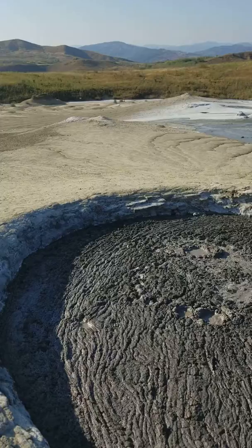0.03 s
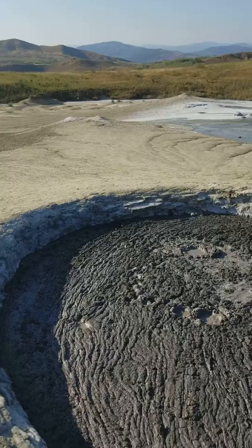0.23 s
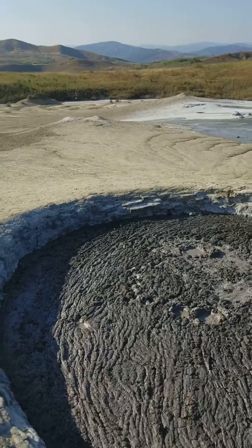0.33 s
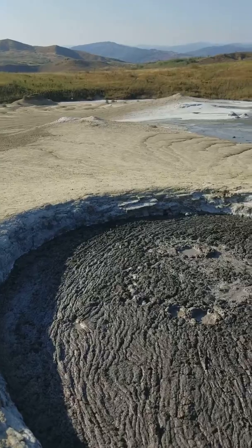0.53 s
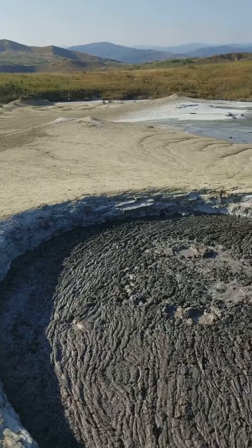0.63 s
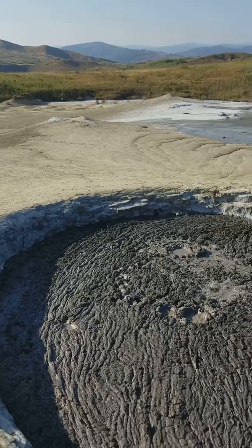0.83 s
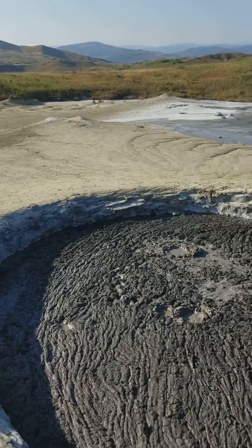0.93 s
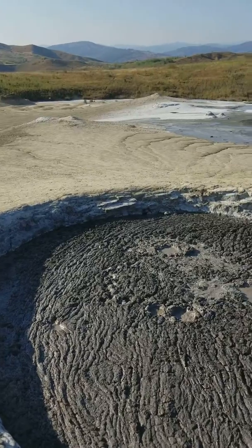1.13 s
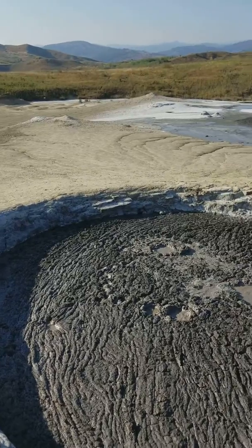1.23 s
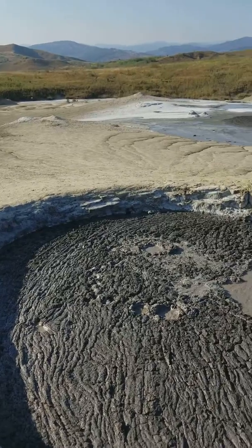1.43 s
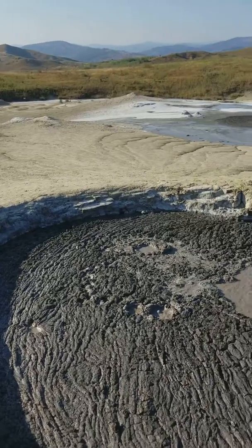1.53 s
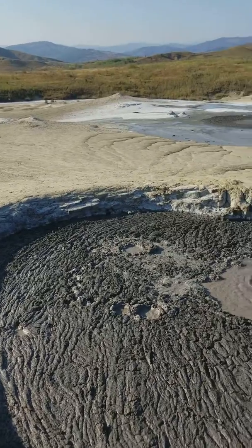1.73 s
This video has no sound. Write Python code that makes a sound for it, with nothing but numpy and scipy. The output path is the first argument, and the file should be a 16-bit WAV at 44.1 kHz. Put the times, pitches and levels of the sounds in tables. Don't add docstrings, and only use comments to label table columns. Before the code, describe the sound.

Close stereo pickup beside bubbling mud in open country; fizzing gas and tiny crackles run throughout, wind buffets the microphone in the first half, wet glugs burst around the middle, and a bigger bubble bursts late.

```python
import sys
import numpy as np
from scipy import signal
from scipy.fft import rfft, irfft
from scipy.io import wavfile
from scipy.ndimage import uniform_filter1d

SR = 44100
rng = np.random.default_rng(int(sys.argv[2]) if len(sys.argv) > 2 else 0)


def boost_factor(decibels):
    exponent = np.asarray(decibels, float) / 20
    return 10 ** exponent


def output_pcm(signal):
    pcm = np.clip(np.atleast_2d(signal).T, -1, 1) * 32767
    wavfile.write(sys.argv[1], SR, np.round(pcm).astype(np.int16))


N = 79380
TOP_HZ = 15750.0
ONSET_S = 0.002


def evened(x):
    return x / np.sqrt(np.mean(x ** 2) + 1e-20)


def read(points, hz):
    f, value = np.transpose(points)
    return np.interp(np.log(hz + 1), np.log(f + 1), value)


def along(table, column=1):
    return np.interp(np.arange(N) / SR, np.array(table)[:, 0], np.array(table)[:, column])


def colour(x, points, lo_hz, hi_hz):
    hz = np.fft.rfftfreq(x.shape[-1], 1 / SR)
    edge = np.clip((hz - lo_hz) / (0.34 * lo_hz), 0, 1) * (hz < hi_hz)
    return irfft(rfft(x) * boost_factor(read(points, hz)) * edge, x.shape[-1])


def slow(shape, seconds):
    size = max(int(seconds * SR), 2)
    noise = rng.standard_normal(shape)
    return evened(uniform_filter1d(uniform_filter1d(noise, size), size))


def add(mix, start_s, sound, lean_db):
    at = round(start_s * SR)
    part = mix[:, at:at + len(sound)]
    part += boost_factor([[lean_db / 2], [-lean_db / 2]]) * sound[:part.shape[1]]


def ring(hz, level_db, wander):
    n = len(hz)
    level = boost_factor(level_db + 3 * wander[0, :n])
    phase = 2 * np.pi * np.cumsum(hz * (1 + 0.025 * wander[1, :n])) / SR
    return np.sqrt(2) * level * np.sin(phase)


def bubble(length_s, first_hz, last_hz, level_db, tail_share=0.55, onset_s=ONSET_S):
    t = np.arange(0, length_s * (1 + tail_share), 1 / SR)
    tail = np.clip((t / length_s - 1 + tail_share) / (2 * tail_share), 0, 1)
    envelope = np.minimum(t / onset_s, 1) * np.cos(np.pi / 2 * tail) ** 2
    hz = first_hz * (last_hz / first_hz) ** (t / length_s)
    return envelope * ring(hz, level_db, slow((2, 8192), 0.0042))


def pockets(out, mud_lean):
    # time_s, pitch_hz, level_db
    large_pocket = [(1.4285, 172, -52), (1.434, 180, -47), (1.456, 222, -43), (1.48, 293, -36),
                    (1.494, 350, -33), (1.504, 400, -38), (1.513, 445, -49), (1.522, 465, -48),
                    (1.537, 485, -62)]
    # time_s, pitch_hz, level_db
    pocket_neck = [(1.4295, 312, -48), (1.447, 325, -46), (1.468, 423, -46), (1.48, 510, -45),
                   (1.487, 565, -53), (1.494, 595, -48), (1.51, 600, -62), (1.52, 610, -56),
                   (1.545, 700, -70)]
    # time_s, pitch_hz, level_db
    gulp = [(.41, 260, -56), (.43, 294, -54), (.447, 400, -58), (.46, 620, -60), (.468, 740, -67),
            (.476, 790, -60), (.508, 1050, -73)]
    # time_s, pitch_hz, level_db
    blurt = [(1.577, 800, -52), (1.584, 860, -46), (1.592, 930, -51), (1.6, 1250, -57), (1.608, 1850, -66)]
    for table in (large_pocket, pocket_neck, gulp, blurt):
        s, pitch_hz, level_db = np.transpose(table)
        t = np.arange(s[0], s[-1], 1 / SR)
        edges = np.minimum(np.minimum(t - s[0], s[-1] - t) / ONSET_S, 1)
        hz = uniform_filter1d(np.interp(t, s, pitch_hz), size=250)
        tone = ring(hz, np.interp(t, s, level_db), 0.5 * slow((2, 8192), 0.004))
        add(out, s[0], edges * tone, read(mud_lean, pitch_hz.mean()))


def rim_echo(x):
    # delay_s, level_db
    rim_echoes = [
        (.0031, -19),
        (.0085, -21),
    ]
    rim = np.zeros((2, 2048))
    rim[:, 0] = 1
    for delay_s, level_db in rim_echoes:
        at = (delay_s * SR * rng.uniform(0.85, 1.15, 2)).astype(int)
        rim[[0, 1], at] = boost_factor(level_db) * rng.choice([-1, 1], 2)
    return signal.fftconvolve(x, rim, axes=1)[:, :N]


def mud():
    # freq_hz, left_over_right_db
    mud_lean = [(200, -6), (500, 3.5), (1000, -1), (2000, -13.5)]
    # freq_hz, left_lead_rad
    mud_lead = [(200, -.2), (1100, -.45)]
    # start_s, length_s, first_hz, last_hz, level_db
    glugs = [(0.082, 0.025, 950, 800, -75), (0.341, 0.016, 800, 1200, -74), (.352, .022, 720, 1150, -74),
             (0.387, 0.03, 560, 600, -72), (.553, .02, 470, 640, -69), (0.575, 0.026, 597, 550, -70),
             (0.558, 0.071, 914, 769, -74), (.712, .05, 350, 460, -72), (0.792, 0.02, 780, 1074, -68),
             (0.815, 0.011, 1140, 1670, -74), (0.888, 0.02, 1034, 1010, -67), (0.909, 0.045, 337, 363, -62),
             (0.945, .025, 560, 800, -65), (0.913, 0.011, 1302, 1770, -59), (0.985, 0.016, 400, 520, -66),
             (1.021, 0.016, 900, 1266, -64), (1.551, 0.022, 1745, 1700, -67),
             (1.612, 0.0089, 1030, 920, -50), (1.405, .026, 240, 340, -68), (1.54, .03, 700, 850, -66),
             (1.322, .012, 850, 700, -70), (1.334, .022, 720, 800, -71), (.85, .013, 800, 1050, -72)]
    # start_s, pitch_hz, level_db, length_s
    plips = [(.108, 1430, -75.5, .01), (0.115, 1200, -74.5, .006), (0.141, 1430, -74, 0.0076),
             (0.135, 736, -79, .008), (0.171, 1540, -63.5, 0.0047), (.18, 1520, -69, 0.0074),
             (.163, 870, -71, .012), (.214, 777, -73.5, .009), (0.25, 1680, -69, 0.006),
             (.39, 880, -73, 0.0062), (.413, 806, -66, 0.0094), (0.426, 610, -63.5, 0.01),
             (0.446, 860, -69, .008), (0.781, 478, -63, .007), (0.841, 3340, -70, 0.0032),
             (0.864, 4150, -71.5, 0.0033), (0.862, 2290, -78, .004), (.909, 510, -60, 0.0054),
             (.917, 460, -53, 0.0093), (.918, 994, -59, 0.008), (0.93, 505, -54, 0.0063),
             (.938, 590, -60.5, 0.0072), (.939, 1725, -65.5, 0.0097), (0.961, 1320, -69, 0.0063),
             (0.966, 960, -60, 0.006), (0.975, 760, -61.5, .006), (.985, 805, -66, 0.01),
             (1.0, 1045, -75, .008), (1.013, 765, -62.5, .006), (1.022, 777, -58.5, 0.0062),
             (1.041, 900, -70, .006), (1.054, 880, -70, .006), (1.069, 704, -68, 0.0069),
             (1.098, 824, -66, 0.0067), (1.109, 795, -70.5, .006), (1.131, 840, -64, 0.0076),
             (1.326, 1117, -65.5, 0.01), (1.324, 1600, -75, .005), (1.373, 1620, -72.5, .006),
             (1.574, 599, -55, 0.01), (1.577, 1550, -61.5, 0.0045), (1.613, 1340, -57, .006),
             (1.623, 2155, -68.5, 0.0084), (1.653, 792, -70, 0.013), (1.436, 2990, -75, 0.0043),
             (1.469, 3040, -74.5, 0.0038), (1.622, 1000, -62, .006)]
    plip_rise = 1.03
    out = np.zeros((2, N))
    pockets(out, mud_lean)
    for start_s, length_s, first_hz, last_hz, level_db in glugs:
        add(out, start_s, bubble(length_s, first_hz, last_hz, level_db), read(mud_lean, first_hz))
    for start_s, hz, level_db, length_s in plips:
        plip = bubble(length_s, hz / plip_rise, hz * plip_rise, level_db)
        add(out, start_s - ONSET_S, plip, read(mud_lean, hz))
    left, right = rim_echo(out)
    turn = np.exp(-1j * read(mud_lead, np.fft.rfftfreq(N, 1 / SR)))
    return np.array([left, irfft(rfft(right) * turn, N)])


def splashes():
    # start_s, length_s, level_db, lowest_hz
    splash_bursts = [
        (0.102, 0.14, -76, 606),
        (0.407, 0.032, -77, 450),
        (0.57, 0.26, -82, 300),
        (0.785, 0.098, -74, 494),
        (0.905, 0.059, -63, 300),
        (0.942, 0.18, -73, 394),
        (1.319, 0.014, -66.5, 500),
        (1.54, 0.058, -69, 600),
        (1.579, 0.079, -59, 784),
    ]
    # freq_hz, level_db_per_hz
    splash_colour = [(300, -1.5), (900, 0), (1800, -4), (2500, -18), (4500, -14.5), (14000, -31)]
    droplets_per_s, droplet_db = 330, 1
    t, out, drops = np.arange(N) / SR, np.zeros((2, N)), np.zeros((2, N))
    for when, pitch, size, side in rng.random((int(droplets_per_s * N / SR), 4)):
        hz = 300 * 6 ** pitch
        drop = bubble(6 / hz, hz, 1.15 * hz, read(splash_colour, hz) - 20 * size)
        add(drops, when * N / SR, drop, 10 * side - 7)
    a, b = rng.standard_normal((2, N)) * boost_factor(5.2 * slow(N, 0.0035))
    grains = np.array([0.64 * a + 0.8 * b, a])
    wet = evened(colour(grains, splash_colour, 200.0, TOP_HZ)) + boost_factor(droplet_db) * evened(drops)
    for start_s, length_s, level_db, low_hz in splash_bursts:
        decay = boost_factor(level_db - 14 * np.clip((t - start_s) / length_s, 0, 9) ** 2)
        onset = np.clip((t - start_s) / 0.006, 0, 1)
        out += decay * onset * colour(wet, [(100, 0), (200, 0)], 0.8 * low_hz, TOP_HZ)
    return out


def paired(a, b):
    # freq_hz, correlation
    port_likeness = [(300, .55), (1500, .6), (3000, .45), (8000, .55), (15000, .45)]
    # freq_hz, left_lead_rad
    gas_lead = [(1000, -0.5), (7000, 1.5), (15000, 6)]
    # freq_hz, left_over_right_db
    gas_lean = [(4000, 0), (9000, -3.5), (14000, -1.5)]
    hz = np.fft.rfftfreq(N, 1 / SR)
    same = np.clip(read(port_likeness, hz), -1, 1)
    left = rfft(a) * boost_factor(read(gas_lean, hz))
    shared = same * np.exp(-1j * read(gas_lead, hz)) * rfft(a)
    right = shared + np.sqrt(1 - same ** 2) * rfft(b)
    return np.array([irfft(left, N), irfft(right, N)])


def gas():
    # time_s, fizz_level_db
    gas_effort = [
        (.07, -78),
        (.6, -73),
        (1.8, -72),
    ]
    # freq_hz, level_db_per_hz
    hiss_colour = [(250, -1.5), (900, -7.5), (1700, -10.5), (3300, -10), (4600, -19), (6500, -26)]
    # freq_hz, level_db_per_hz
    fizz_colour = [(2650, -33), (4600, -22), (5900, -8.5), (7260, -3), (9500, -8.5), (10900, -1),
                   (12900, -2), (15800, -5)]
    # start_s, level_db
    skin_cracks = [(.1621, -56), (0.177, -56), (0.369, -62), (.461, -58), (0.5674, -58.5), (0.7175, -62),
                   (0.9156, -49.5), (.926, -52), (1.0647, -61), (1.1574, -61.5), (1.5727, -54),
                   (1.592, -49), (1.6, -55), (1.6202, -49.5), (1.631, -53), (1.6516, -51.5), (1.685, -57)]
    # freq_hz, level_db_per_hz
    crack_colour = [(2000, -12), (4600, -17), (7200, -5), (13000, -3)]
    rest_db, hiss_db, hiss_follows = -74.5, -77, 0.63
    crackles_per_s, crackle_db, crackle_spread_db, crackle_follows = 350, -4, 4, 0.5
    crack_db, crack_decay_s = 4.5, 0.0019

    fizz_db = along(gas_effort)
    effort_db = fizz_db - rest_db
    decay = np.exp(-np.arange(300) / (crack_decay_s * SR))
    pops = boost_factor(crackle_spread_db * np.minimum(rng.exponential(1, N), 3))
    pops = pops * (rng.random(N) < crackles_per_s / SR)
    crackle = evened(np.convolve(pops, decay)[:N])
    crackle = boost_factor(crackle_db + crackle_follows * effort_db) * crackle
    flicker = boost_factor(0.47 * slow(N, 0.0048) + 0.24 * slow(N, 0.019))

    a, b, c, d, e, f = rng.standard_normal((6, N))
    fizz = paired(a, b) * np.sqrt(flicker ** 2 + crackle ** 2)
    fizz = evened(colour(fizz, fizz_colour, 2200.0, TOP_HZ))
    hiss = evened(colour(paired(c, d) * flicker, hiss_colour, 200.0, TOP_HZ))
    spikes = np.zeros(N)
    for start_s, level_db in skin_cracks:
        spikes[round(start_s * SR)] = boost_factor(level_db + crack_db)
    cracks = paired(e, f) * np.convolve(spikes, decay)[:N]
    cracks = colour(cracks, crack_colour, 1500.0, TOP_HZ)
    return boost_factor(fizz_db) * fizz + boost_factor(hiss_db + hiss_follows * effort_db) * hiss + cracks


def wind():
    # time_s, level_db, left_over_right_db
    gusts = [(.07, -70, 1), (.126, -49.5, 9), (.18, -51, 4.5), (.275, -52.5, -8), (.314, -56, -9),
             (.41, -47, 7), (.45, -54.5, 6), (.56, -49.5, 20.5), (.62, -41, 17), (.69, -45, 17),
             (.724, -55.5, 0), (.765, -45.5, 9.5), (.8, -59.5, 2), (1.2, -70, -3.5), (1.22, -60, 5),
             (1.37, -68, 5), (1.58, -58, 2), (1.63, -69.5, 4)]
    # freq_hz, level_db_per_hz
    calm_colour = [(20, -6.5), (45, 6), (90, -1), (150, -10), (250, -22.5), (500, -80)]
    # freq_hz, level_db_per_hz
    gust_colour = [(20, -7), (60, -5.5), (100, 6.5), (170, -2.5), (300, -12), (600, -30.5), (1000, -68)]
    # start_s, level_db, width_s, left_over_right_db
    slaps = [
        (.6745, -52, .00055, 30),
        (.6748, -39.5, .0012, 30),
        (.163, -45, .004, -16),
        (.131, -45, .002, 16),
        (1.218, -54, .002, 12),
        (1.242, -57, .002, 10),
        (1.275, -57, .0022, 10),
    ]
    # start_s, length_s, first_hz, last_hz, level_db
    flutter = [
        (.584, .06, 92, 98, -30.5),
        (.603, .043, 165, 158, -34),
    ]
    calm_db, gust_db, lump_db, lump_s = -50.5, -30.5, 4.5, 0.011

    lean_db = along(gusts, column=2)
    port_share = 4 / (1 + 10 ** (np.array([-lean_db, lean_db]) / 10))
    level_db = along(gusts) + 10 * np.log10(port_share)
    strong = np.clip((level_db - calm_db) / (gust_db - calm_db), 0, 1)
    stir = rng.standard_normal((2, N)) * boost_factor(lump_db * slow((2, N), lump_s))
    calm = evened(colour(stir, calm_colour, 2.9, TOP_HZ))
    gust = evened(colour(stir, gust_colour, 2.9, TOP_HZ))
    air = (1 - strong) * calm + strong * gust
    power = uniform_filter1d(uniform_filter1d(air ** 2, size=1800), size=1800)
    out = boost_factor(level_db) * air / np.sqrt(power + 0.05)
    for start_s, slap_db, width_s, side_db in slaps:
        u = np.arange(-4 * width_s, 4 * width_s, 1 / SR) / width_s
        pulse = (1 - u ** 2) * np.exp(-u ** 2 / 2)
        add(out, start_s - 4 * width_s, np.sign(side_db) * boost_factor(slap_db) * pulse, side_db)
    for start_s, *shape in flutter:
        tone = bubble(*shape, tail_share=0.12, onset_s=0.01)
        at = round(start_s * SR)
        out[0, at:at + len(tone)] += tone
    return out


def scene():
    return mud() + splashes() + gas() + wind()


def top_cut(x):
    return signal.sosfilt(signal.butter(12, 15750, fs=SR, output="sos"), x)


def record(dry):
    start_s, fade_s = 0.058, 0.027
    fade = np.clip((np.arange(N) / SR - start_s) / fade_s, 0, 1)
    return top_cut(dry * fade)


dry = scene()
out = record(dry)
output_pcm(out)
```